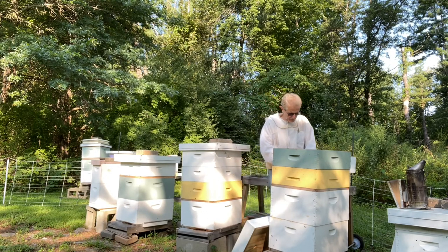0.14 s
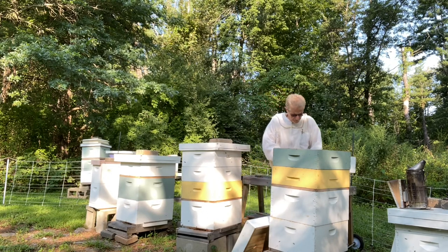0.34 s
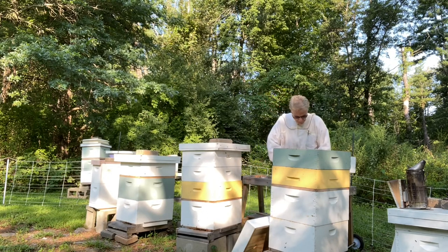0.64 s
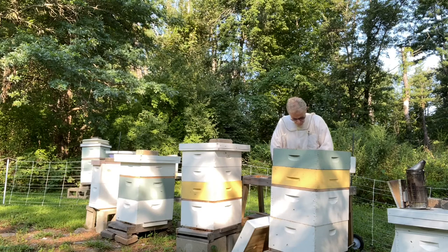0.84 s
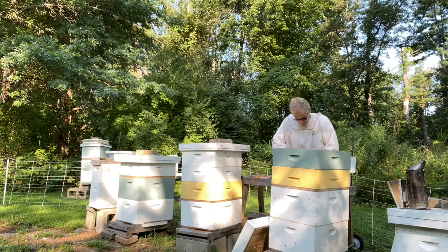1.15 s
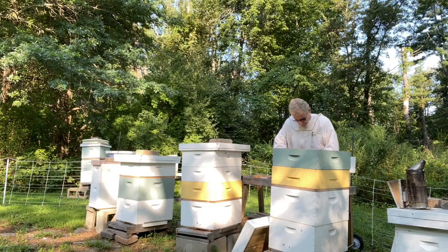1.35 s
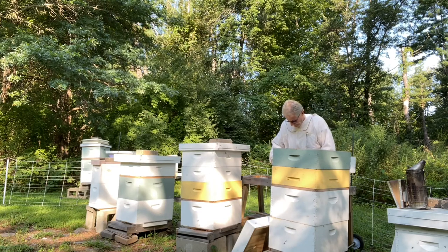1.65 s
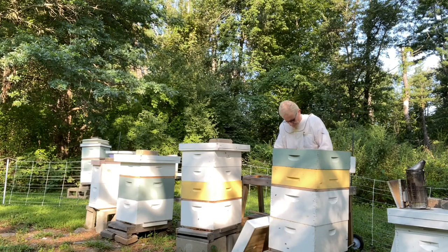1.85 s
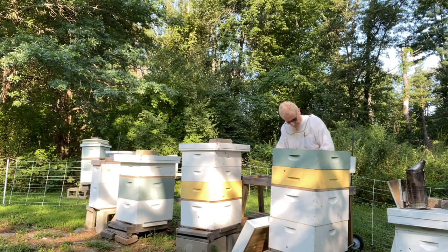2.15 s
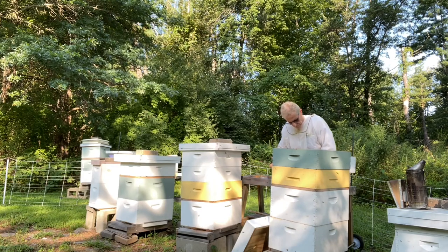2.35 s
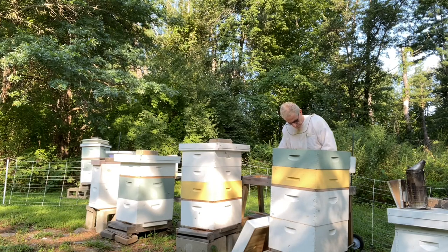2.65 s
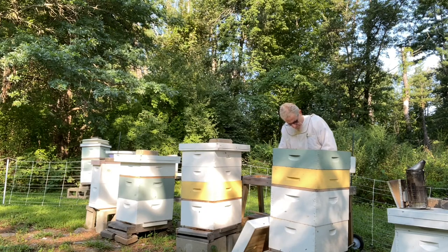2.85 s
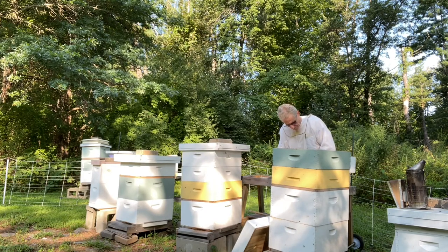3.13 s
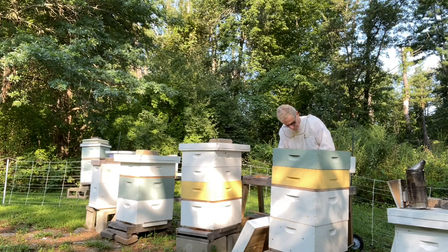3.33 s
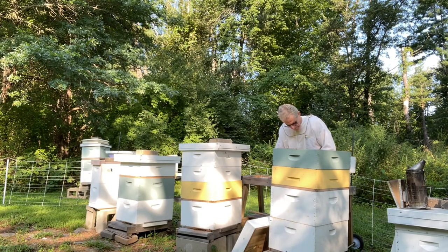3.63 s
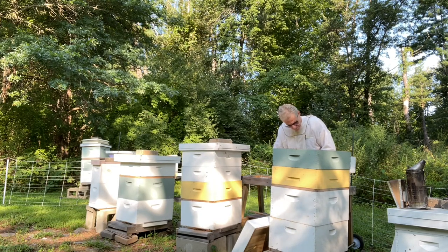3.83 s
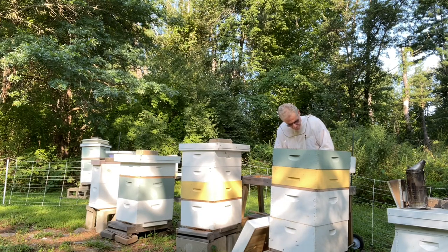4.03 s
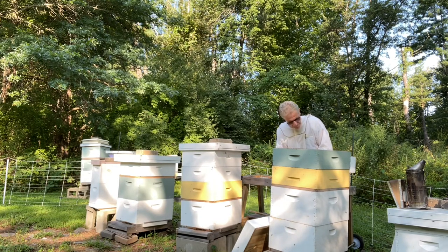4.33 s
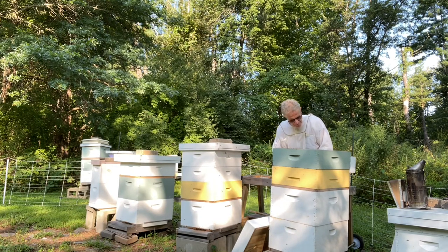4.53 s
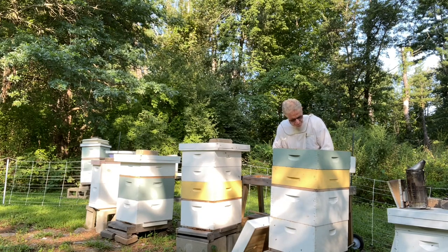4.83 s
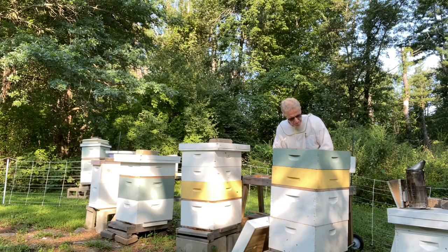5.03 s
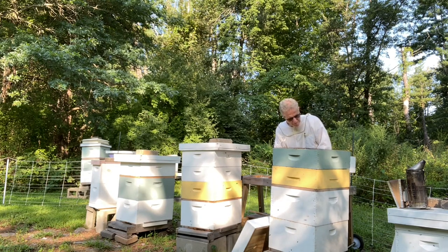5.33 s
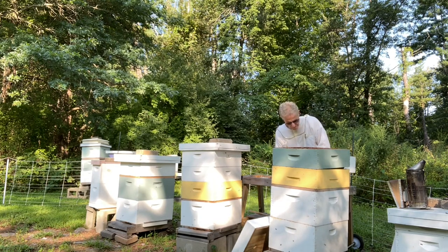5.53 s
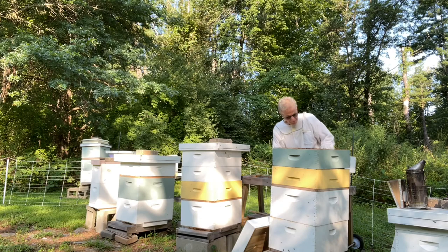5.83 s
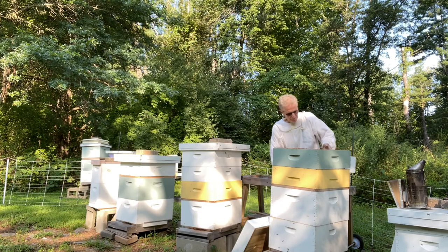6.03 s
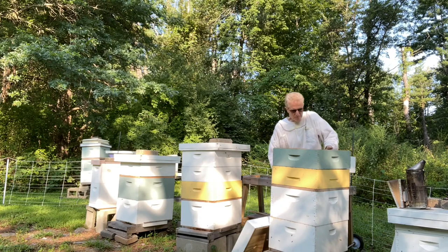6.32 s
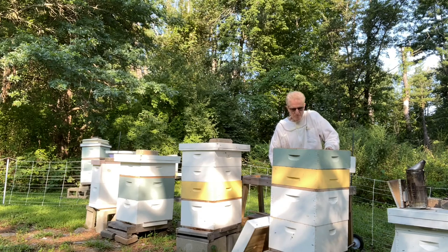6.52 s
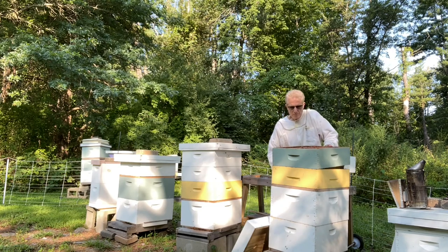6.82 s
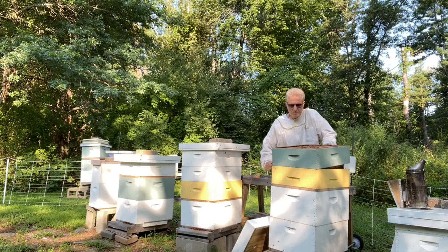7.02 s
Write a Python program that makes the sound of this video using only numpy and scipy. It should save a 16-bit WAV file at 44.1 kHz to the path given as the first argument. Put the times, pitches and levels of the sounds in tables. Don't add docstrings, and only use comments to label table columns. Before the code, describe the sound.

Continuous, fast-pulsing high insect trills dominate an open, grassy yard. Short three-pulse chirps repeat about every four tenths of a second, with pauses. A cluster of dull wooden knocks comes early, followed by drier clicks near four seconds, a little crackling flurry past five and soft knocks and a light metallic tap near the end. Soft cloth brushes, muffled steps, breeze and low distant rumble sit underneath; everything is dry, heard by a single microphone.

```python
import sys
import numpy as np
from scipy import signal
from scipy.fft import rfft, irfft, next_fast_len
from scipy.io import wavfile

SR = 44100
rng = np.random.default_rng(int(sys.argv[2]) if len(sys.argv) > 2 else 0)


def undo_db(level):
    steps = np.asarray(level, float) / 20
    return 10 ** steps


def pcm_store(signal):
    levels = np.round(np.clip(np.atleast_2d(signal), -1, 1) * 32767)
    wavfile.write(sys.argv[1], SR, levels.astype(np.int16).T)


N = 316285

# [t/ms from its middle, f/Hz, level/dB]
NEAR_STROKE = [(-6.5, 6450, -36), (-5, 6440, -6), (-2.5, 6455, -2.5), (-.5, 6444, -1), (2.5, 6440, -4.5),
               (4.5, 6336, -5), (6, 6150, -10), (8.5, 6000, -24.5)]
FAR_STROKE = [(-5.5, 7300, -18), (-3.5, 7330, -6), (0, 7395, -1.5), (1.5, 7330, -4), (3.5, 7230, -6.5),
              (9, 7240, -23)]
CHIRP_STROKE = [(-15.5, 5000, -7), (-9, 4970, -11.5), (-6, 4890, -1), (1, 4810, -1.5), (5, 4690, -3),
                (7.5, 4590, -11), (10.5, 4150, -32)]
# [t/s, lateness/ms]
NEAR_LATENESS = [(0.0, 1.84), (0.9, 0.8), (2.3, 2.67), (3.501, 3.5), (4.5, 4.2), (5.5, 6.1), (5.9, 5.3),
                 (7.17, 4.1)]
FAR_LATENESS = [(0.0, -1.5), (0.7, -2.5), (1.2, -0.7), (2.7, -2.0), (3.899, 0.9), (5.9, 2.0), (6.7, -2),
                (7.17, -1.8)]
MISSED_STROKES = [54, 157]
# [t/s of the middle stroke, level/dB]
CHIRPS = [(.2033, -45), (.5677, -45), (0.909, -45), (1.261, -45), (1.681, -45), (3.0463, -45.5),
          (3.617, -46.5), (3.9692, -46), (4.3856, -45.5), (4.789, -45.5), (5.2116, -45), (5.6176, -45.5),
          (5.9978, -45), (6.6223, -45.5), (7.0115, -44.5)]
# [t/s of the middle stroke, level/dB]
FAR_CHIRPS = [(.82, -63), (1.95, -67), (2.33, -62), (2.73, -72), (3.13, -63), (3.44, -61), (3.87, -59),
              (5.30, -64), (5.77, -57.5), (6.9, -61)]
# [t/s from the middle one, stretch/ratio, level/dB, tuning/ratio]
CHIRP_PATTERN = [
    (-.041, .6, -5, 1.0),
    (.0001, 1.0, -3.9, 1.002),
    (.046, 1.25, -4.5, 1.004),
]
# [t/s, peak level/dB near 1300 Hz, weight/dB, brightness/dB]
KNOCKS = [(2.3603, -45.5, -6, -7), (2.3684, -39, 1, -3), (2.5138, -47.5, -6, -7), (2.6871, -31.5, -19, -15),
          (2.6968, -39.5, 7, -19), (2.737, -44, 8, -15), (2.9595, -45, -18, 3), (3.0671, -53, 0, -1),
          (3.1549, -53, -9, 0.5), (4.0108, -50.5, -7, -5), (4.1515, -45, -11, 6.5), (4.1608, -44.5, -21, 1),
          (4.2504, -44, -10, 3.5), (4.3742, -50, -16, 1), (4.433, -45, -23, -12), (4.6244, -57.5, -3, 6),
          (5.225, -53.5, -10, 0), (5.2833, -58, 1, 3), (5.3032, -55, -12.5, 0), (5.3238, -47, -4, -6),
          (5.3312, -48.5, -7, -3), (5.3537, -45.5, -14, 2), (6.4962, -52.5, 7.5, -7),
          (6.797, -54.5, -8, -3)]
# [t/s, peak level/dB near 1300 Hz, weight/dB, brightness/dB]
BRUSHES = [(0.435, -52, -8, -6), (1.1303, -50, -7, -7.5), (1.8492, -55, 0, -1), (3.24, -48, -7, -14),
           (6.1993, -57.5, 7, -8), (6.9112, -57.5, 9, -0.5)]
# [f/Hz, t60/ms]
WOOD_MODES = [(150, 90), (260, 23), (390, 90), (560, 37), (720, 38), (950, 7.2), (1250, 9), (1520, 20),
              (1850, 11), (2150, 24), (2500, 17), (2950, 5.8), (3500, 7.4), (4200, 2), (5200, 9.2),
              (7000, 3), (9500, 2.8), (12000, 2.2), (14500, 2.5)]
# [t/s, peak level/dB]
TAPS = [
    (0.3504, -51.5),
    (3.4976, -62),
    (3.5872, -56),
    (4.6614, -55.5),
    (5.3453, -54),
    (6.4921, -52.5),
    (6.6827, -65),
]
# [f/Hz, level/dB, t60/ms]
TOOL_MODES = [
    (1815, -2, 46),
    (2735, 1.5, 45),
]
# [t/s, peak level/dB]
SNAPS = [(4.012, -48.5), (4.152, -52), (4.1604, -51), (4.2502, -54), (5.2026, -54), (5.3444, -53),
         (5.3507, -45)]
# [f/Hz, level/dB]
CICADA_COLOUR = [(1990, -6), (5350, -8), (5560, -9), (5700, 2), (5830, 2), (5980, -8), (7800, -9),
                 (7990, 4), (8025, 4), (8045, -6), (8300, -10), (9300, -11), (10500, -16), (12500, -21)]
CICADA_MULTIPLES = [10, *range(27, 34), *range(40, 62)]
# [t/s, length/s, level/dB]
STEPS = [(0.431, 0.055, -46.5), (1.227, 0.03, -49), (1.824, 0.045, -46.5), (2.48, 0.084, -47),
         (2.69, 0.092, -46.5), (3.157, 0.18, -47.5), (6.198, 0.06, -46), (6.923, 0.089, -46)]
# [t/s, level/dB]
BREEZE = [(0.0, -66), (1.0, -65), (1.94, -63.5), (2.35, -64.5), (3.03, -63), (3.4, -59), (4.1, -58.5),
          (4.5, -63), (4.95, -67.5), (6.1, -69.5), (6.8, -68.5), (7.17, -65.5)]
# [f/Hz, level/dB per Hz]
RUMBLE = [(12, -57), (20, -19), (27, -39), (39, -10), (55, 0), (80, 3), (100, -30), (180, -120)]
THUD = [(70, -12), (85, -3.5), (125, -0.5), (160, -7.5), (220, -17), (300, -39)]
LOW_HISS = [(150, 2.5), (250, 5), (400, 3), (480, -2.5), (900, 1.15), (1500, -3), (1900, -7), (2600, -31)]
LEAF_HISS = [(1200, -4), (1800, -0.5), (2500, 0.5), (3200, -2), (4200, -8), (5000, -15), (6000, -43)]
CHORUS = [(4300, -26), (4900, -16), (5500, -19), (6000, -11.5), (6500, -17), (6900, -0.5), (7350, -1.5),
          (7700, -3.5), (8100, -8.5), (8500, -17), (9000, -23), (9600, -28)]
TOP_HISS = [(8400, -25), (9000, -6), (11000, -11), (12400, -8.5), (13050, -26), (13300, -16), (13700, -22),
            (13850, -4.5), (14800, 0.5), (15700, -5.5), (15900, -32)]


def strokes(times, levels_db, stretches, tunings, stroke, overtone_db, waver):
    out = np.zeros(N + SR)
    ms, hz, level_db = np.transpose(stroke)
    chances = rng.standard_normal((len(times), 3))
    for s, db, stretch, tuning, (turn, tune, force) in zip(times, levels_db, stretches, tunings, chances):
        at = np.arange(ms[0] * stretch, ms[-1], 1000 / SR)
        shape = np.where(at < 0, at / stretch, at)
        pitch = np.interp(shape, ms, hz) * (tuning + waver * tune)
        phase = 2 * np.pi * np.cumsum(pitch) / SR + 10 * turn
        gain = np.interp(shape, ms, undo_db(level_db)) * undo_db(db + 0.5 * force) * np.sqrt(2)
        start = SR // 2 + round((s + at[0] / 1000) * SR)
        out[start:start + len(at)] += gain * (np.sin(phase) + undo_db(overtone_db) * np.sin(2 * phase))
    return out[SR // 2:SR // 2 + N]


def trill(per_s, lateness, stroke, level_db, overtone_db, waver, missed=()):
    beat = np.delete(np.arange(int(N / SR * per_s) + 2), list(missed)) / per_s
    jitter_s = rng.normal(0, 0.00025, len(beat))
    times = beat + np.interp(beat, *np.transpose(lateness)) / 1000 + jitter_s
    same = np.ones(len(beat))
    return strokes(times, level_db * same, same, same, stroke, overtone_db, waver)


def echoes(x, paths):
    return x + sum(undo_db(db) * np.pad(x, (round(s * SR), 0))[:N] for s, db in paths)


def field_cricket(chirps, sharp):
    rows = []
    for s, db in chirps:
        for later_s, stretch, change_db, tuning in CHIRP_PATTERN:
            rows.append((s + later_s, db + change_db, stretch, sharp * tuning))
    direct = strokes(*np.transpose(rows), CHIRP_STROKE, overtone_db=-51, waver=0.0039)
    in_step_hz = 4690
    return echoes(direct, [(18 / in_step_hz, -8), (0.0113, -12), (0.027, -16), (0.048, -18)])


def ring(clicks, hz, t60_ms):
    r = undo_db(-60000 / (t60_ms * SR))
    w = 2 * np.pi * hz / SR
    return signal.lfilter([0, np.sin(w)], [1, -2 * r * np.cos(w), r * r], clicks + 1e-18)


def contacts(table, length_ms):
    out, t = np.zeros(N), np.arange(SR // 9) / SR
    crack_band = signal.butter(2, [900, 5000], "band", fs=SR, output="sos")
    colour_hz = [330, 650, 1350, 2300, 4200, 8000, 14000]
    for s, db, weight_db, bright_db in table:
        body_db = -7 + 0.45 * weight_db
        snap_db = -20.5 + 0.19 * bright_db - 0.4 * (db + 45)
        levels_db = [weight_db - 3.5, body_db - 4, -2.5, bright_db - 5, bright_db - 5.5,
                     snap_db - 2, 2 * snap_db + 22]
        grit = rng.standard_normal(len(t)) * undo_db(3.3 * rng.standard_normal(len(t)))
        push = grit * np.exp(-(1000 * t / length_ms) ** 2)
        crack = signal.sosfilt(crack_band, push)
        blow = undo_db(db + bright_db - 7.5) * crack / np.abs(crack).max()
        for (hz, t60_ms), luck in zip(WOOD_MODES, rng.standard_normal(len(WOOD_MODES))):
            colour_db = np.interp(np.log(hz), np.log(colour_hz), levels_db)
            part = ring(push, hz, t60_ms)
            blow += undo_db(db + colour_db + 1.65 * luck) * part / np.abs(part).max()
        start = round(s * SR)
        out[start:start + len(t)] += blow
    return out


def taps():
    clicks = np.zeros(N)
    for s, db in TAPS:
        clicks[round(s * SR)] = undo_db(db + 3)
    return sum(undo_db(db) * ring(clicks, hz, t60_ms) for hz, db, t60_ms in TOOL_MODES)


def snaps():
    t, length_ms = np.arange(N) / SR, 3.9
    shape = sum(undo_db(db) * (t >= s) * np.exp(-(1000 * (t - s) / length_ms) ** 2) for s, db in SNAPS)
    bright = signal.butter(4, 8400, "high", fs=SR, output="sos")
    return shape * signal.sosfilt(bright, rng.standard_normal(N))


def rms_one(x):
    return x / np.sqrt(np.mean(x ** 2) + 1e-20)


def drift(rate):
    r = np.exp(-80 * np.pi * rate / SR)
    slow = signal.lfilter([1], [1, -2 * r, r * r], rng.standard_normal(N // 40 + 2002))[2000:]
    return np.interp(np.arange(N) / 40, np.arange(len(slow)), rms_one(slow - slow.mean()))


def cicada():
    t = np.arange(0, N, 16) / SR
    tires_s, tiring_s = 5.55, 0.25
    sag = 17 * tiring_s * np.log(1 + np.exp((t - tires_s) / tiring_s))
    steady = (198.6 + 0.2 * t - sag) * (1 + 0.0002 * drift(6)[::16])
    behind = 6.6 * np.exp(-t / 0.7)
    rates = steady - behind, 1.008 * (steady - 0.3 * behind)
    phases = [2 * np.pi * np.cumsum(np.repeat(per_s, 16)[:N]) / SR for per_s in rates]
    loudest_s, neighbour_stops_s = 4.4, 5.9
    own_db = -68.5 - np.maximum(2 * (loudest_s - t), 2.5 * (t - loudest_s))
    neighbour_db = -73.5 - 13 / (1 + np.exp((neighbour_stops_s - t) / tiring_s))
    levels_db = own_db, neighbour_db
    lines = np.zeros(N)
    for k in CICADA_MULTIPLES:
        who = int(k >= 40)
        fading_db = (1.5, 6.5)[who] * drift(0.8)[::16]
        db = np.interp(k * rates[who], *np.transpose(CICADA_COLOUR)) + levels_db[who] + fading_db + 3
        lines += np.interp(np.arange(N) / SR, t, undo_db(db)) * np.sin(k * phases[who] + k * k)
    return lines


def footfalls():
    t, attack_s, release_s = np.arange(N) / SR, 0.033, 0.075
    level = np.zeros(N)
    for s, hold, db in STEPS:
        corners = [s - attack_s, s, s + hold, s + hold + release_s]
        level += undo_db(db - 3) * np.interp(t, corners, [0, 1, 1, 0])
    return level


def hiss(spectrum, flicker_db, rate):
    size = next_fast_len(N)
    hz, level_db = np.transpose(spectrum)
    log_hz = np.log(np.fft.rfftfreq(size, 1 / SR) + 1)
    shape = np.interp(log_hz, np.log(hz), level_db, left=-99, right=-99)
    noise = irfft(rfft(rng.standard_normal(size)) * undo_db(shape), size)[:N]
    return rms_one(noise * undo_db(flicker_db * drift(rate)))


def background():
    leaf_db = np.interp(np.arange(N) / SR, *np.transpose(BREEZE))
    swing_db = leaf_db + 65
    thuds = np.hypot(undo_db(-56 + 0.2 * swing_db), footfalls()) * hiss(THUD, 1.62, 6.7)
    low = undo_db(-61 + 0.26 * swing_db + 1.5) * hiss(LOW_HISS, 0.63, 6)
    leaves = undo_db(leaf_db + 0.27) * hiss(LEAF_HISS, 0.61, 13)
    chorus = undo_db(-51) * hiss(CHORUS, 0.49, 24)
    tiny_insects = undo_db(-67) * hiss(TOP_HISS, 1, 60)
    far_traffic = undo_db(-53) * hiss(RUMBLE, 1.5, 3)
    return thuds + low + leaves + chorus + tiny_insects + far_traffic


def scene():
    near = trill(42, NEAR_LATENESS, NEAR_STROKE, -36, -27.5, 0.00062, missed=MISSED_STROKES)
    far = trill(46.3, FAR_LATENESS, FAR_STROKE, -42.5, -25, 0.0028)
    crickets = echoes(near + far, [(0.0091, -21), (0.0173, -19), (0.031, -27)])
    crickets += field_cricket(CHIRPS, sharp=1) + field_cricket(FAR_CHIRPS, sharp=1.025)
    handling = contacts(KNOCKS, length_ms=5.1) + contacts(BRUSHES, length_ms=25.4) + taps() + snaps()
    handling = echoes(handling, [(0.009, -11), (0.021, -19), (0.043, -28)])
    return (crickets + cicada() + handling + background())[None]


def roll_off(x):
    return signal.sosfilt(signal.butter(12, 16550, fs=SR, output="sos"), x)


def record(dry):
    return roll_off(dry)


dry = scene()
out = record(dry)
pcm_store(out)
```